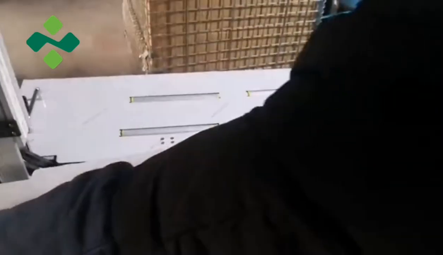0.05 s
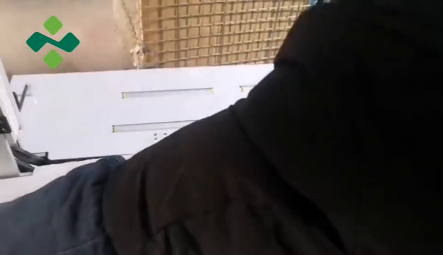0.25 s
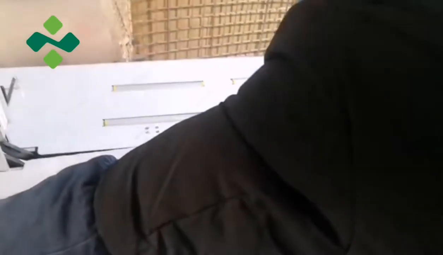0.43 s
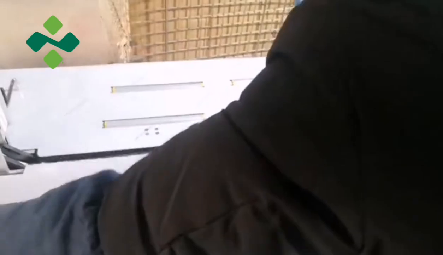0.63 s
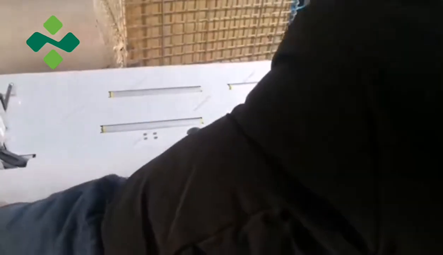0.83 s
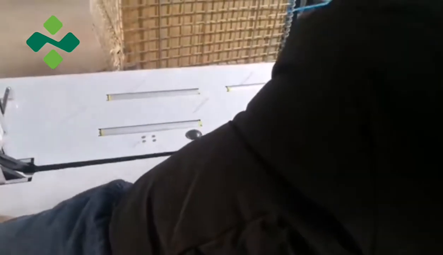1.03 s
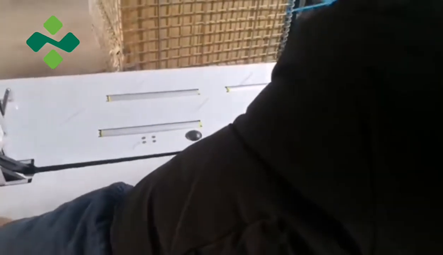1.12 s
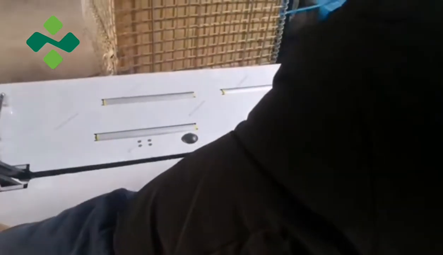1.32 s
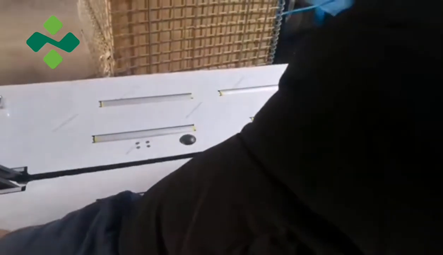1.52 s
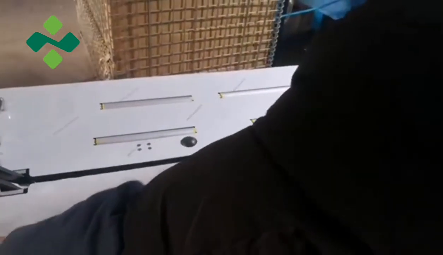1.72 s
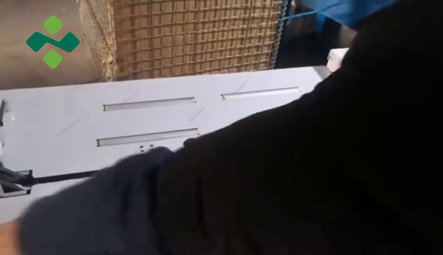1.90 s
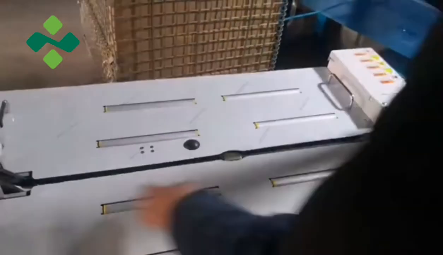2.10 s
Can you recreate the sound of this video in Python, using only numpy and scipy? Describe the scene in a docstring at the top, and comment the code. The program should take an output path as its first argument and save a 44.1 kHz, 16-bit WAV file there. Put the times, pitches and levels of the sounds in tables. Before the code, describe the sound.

Close metallic clacks and rasping strap from one strapping machine cycle, over a low hum.

```python
"""A strapping machine runs one cycle, close on the left in a workshop. Its plastic strap sticks and slips
through a steel guide, first fed, then pulled tight. Clamps and cutter clack and ring in the panels and steel
head; the sheet-metal cabinet rumbles and thuds. The motor drones, loose links rattle and the strap squeals
briefly as it is dragged tight. A low hum, a thin electric whine and fan noise go on throughout."""
import sys
import numpy as np
from scipy.fft import rfft, irfft, next_fast_len
from scipy.io import wavfile
from scipy.ndimage import map_coordinates

SR = 44100
rng = np.random.default_rng(int(sys.argv[2]) if len(sys.argv) > 2 else 0)


def pcm_store(signal):
    """Save signal as 16-bit PCM."""
    levels = np.round(np.clip(np.atleast_2d(signal), -1, 1) * 32767)
    wavfile.write(sys.argv[1], SR, levels.astype(np.int16).T)


N = 94815
ATTACK_S = 0.0011

# steel clamp head modes (frequency [Hz], relative level [dB], t60 [s])
HEAD_MODES = [(1917, -13.5, 0.083), (2347, -8.5, 0.29), (2466, -24.5, 0.23), (2595, -13, 0.11),
              (2635, -3, 0.28), (2840, 1.5, .2), (3135, -7, 0.24), (3360, -1.5, 0.18), (3883, 0, 0.11)]
# left-right likeness (frequency [Hz], correlation [1])
COHERENCE = [(120, .999), (260, 0.9), (500, 0)]
# shadow on the right side (frequency [Hz], share of pan_db [1])
SHADOW_SHARE = [(280, 0.026), (550, 0.38), (1200, 0.39), (2800, 1.02)]


def amp(db):
    """Decibels to gain."""
    return 10 ** (np.asarray(db) / 20)


def unit(x):
    """Scale to rms 1."""
    return x / np.sqrt(np.mean(x ** 2) + 1e-20)


def time_s():
    """Time of each sample."""
    return np.arange(N) / SR


def log_interp(points, hz):
    """Interpolate (frequency [Hz], value) points on a log axis."""
    points_hz, values = np.transpose(points)
    return np.interp(np.log(hz + 1), np.log(points_hz + 1), values)


def curves(rows):
    """One value per sample for each column after the time."""
    times_s, *columns = np.transpose(rows)
    return [np.interp(time_s(), times_s, column) for column in columns]


def wobble(rate_hz):
    """Smooth random curve, rate_hz knots a second."""
    return map_coordinates(rng.standard_normal(N // 8), [time_s() * rate_hz], mode="wrap")


def filtered(x, response):
    """Apply the gain response(hz) by FFT."""
    size = next_fast_len(N + SR // 2)
    return irfft(rfft(x, size) * response(np.fft.rfftfreq(size, 1 / SR)), size)[..., :N]


def skew_rad(hz):
    """Left-right phase angle that gives the coherence at hz."""
    return np.arccos(np.clip(log_interp(COHERENCE, hz), -1, 1))


def shadow(hz, pan_db):
    """Gain of the right side; positive pan_db leans left."""
    return amp(-pan_db * log_interp(SHADOW_SHARE, hz))


def noise(colour, pan_db):
    """Coloured stereo noise, rms 1 on the left."""
    def mid_side_gain(hz):
        angle_rad = skew_rad(hz) / 2
        return amp(log_interp(colour, hz)) * [np.cos(angle_rad), np.sin(angle_rad)]
    mid, side = filtered(rng.standard_normal((2, N)), mid_side_gain)
    left = mid + side
    right = filtered(mid - side, lambda hz: shadow(hz, pan_db))
    return np.array([left, right]) / np.std(left)


def tone(hz, pan_db, waver_hz):
    """Wavering stereo sine, rms 1 on the left; high ones reach the two sides out of step."""
    phase = 2 * np.pi * (rng.random() + np.cumsum(hz + waver_hz * wobble(40.68)) / SR)
    offset_rad = rng.choice([-1, 1]) * skew_rad(hz)
    return np.sqrt(2) * np.array([np.sin(phase), shadow(hz, pan_db) * np.sin(phase + offset_rad)])


def blow(start_s, t60_s, hold_s=0, attack_s=ATTACK_S):
    """Impact envelope: linear rise, exponential decay from hold_s on."""
    age_s = time_s() - start_s
    return np.clip(age_s / attack_s, 0, 1) * amp(-60 * np.maximum(age_s - hold_s, 0) / t60_s)


def resonances(modes, hz, width_hz):
    """Gain of one bell-shaped peak per mode."""
    return sum(amp(db) / (1 + ((hz - mode_hz) / (width_hz / 2)) ** 2) for mode_hz, db, _ in modes)


def metallic(x):
    """Pass through steel: head resonances stand out of a ripple of dense frame modes."""
    def response(hz):
        ripple_db = 3.5 * map_coordinates(rng.standard_normal(N), [hz / 48], mode="wrap")  # 48 Hz knots
        return amp(ripple_db) + amp(-2.5) * resonances(HEAD_MODES, hz, width_hz=24)
    ringing = filtered(x, response)
    return ringing / np.std(ringing[0])


def idle():
    """Electric whine, hum and fan noise of the waiting machine."""
    # whine, one row per harmonic (level [dB], pan [dB])
    harmonics = [(-60.5, 9), (-55.5, 9.5), (-48.5, -1), (-45, 11.5)]
    # fan spectrum (frequency [Hz], relative level [dB])
    fan_colour = [(30, -5.5), (48, -4), (80, 0.5), (130, -13), (240, -10), (560, -17.5), (1600, -8),
                  (2600, -8), (4200, -17.5), (7400, -20), (7900, -57)]
    whine_hz, hum_hz = 649.7, 72
    whine = sum(amp(db + 1.3 * wobble(4.8)) * tone(k * whine_hz, pan_db, waver_hz=0.76)
                for k, (db, pan_db) in enumerate(harmonics, 1))
    hum = amp(-51) * tone(hum_hz, pan_db=0, waver_hz=1.5)
    fan = amp(-39 + 0.38 * wobble(30)) * noise(fan_colour, pan_db=10)
    return whine + hum + fan


def strap_slide(levels, rasp_colour, pan_db, grain_db):
    """The ribbed strap sticks and slips in its steel guide: a grainy, ringing rasp under a hiss."""
    # hiss spectrum (frequency [Hz], relative level [dB])
    hiss_colour = [(2800, -23), (4200, 4), (7400, 4.5), (7800, -34)]
    rasp_db, hiss_db = curves(levels)
    moving = (time_s() > levels[0][0]) & (time_s() < levels[-1][0])
    grain = unit(amp(grain_db * wobble(330)))
    rasp = amp(rasp_db) * metallic(grain * noise(rasp_colour, pan_db))
    hiss = amp(hiss_db) * metallic(grain * noise(hiss_colour, pan_db))
    return moving * (rasp + hiss)


def strap_feed():
    """The strap rushes through its guide."""
    # friction envelope (time [s], rasp [dB], hiss [dB])
    levels = [(.17, -51, -50), (.215, -40, -31.5), (.29, -20.5, -58), (.357, -22.5, -26),
              (.372, -19.5, -16), (.42, -15.5, -27.5), (.48, -23.5, -34.5), (.6, -25.5, -50.5),
              (.645, -34, -75), (.93, -39, -54), (.96, -79, -71)]
    # rasp spectrum (frequency [Hz], relative level [dB])
    rasp_colour = [(550, -16), (1000, -5), (2300, -1), (3500, -2.5), (4500, -10), (7000, -24.5)]
    return strap_slide(levels, rasp_colour, pan_db=9, grain_db=0.2)


def cabinet():
    """The cabinet rumbles with the mechanism and booms when the cam loads it."""
    # sheet-metal modes (frequency [Hz], relative level [dB], t60 [s])
    modes = [(208, 1.5, 0.14), (265, -3, 0.66), (375, -7, 0.21)]
    # cam loads (time [s], level [dB])
    loads = [(0.407, -37), (0.707, -32), (1.031, -21), (1.371, -24.5)]
    # rumble envelope (time [s], level [dB])
    rumble_levels = [(.2, -52), (.41, -38.5), (.58, -34), (.7, -33), (.83, -42.5), (.96, -37.5),
                     (1.07, -32.5), (1.27, -37.5), (1.39, -31.5), (1.56, -44.5), (1.85, -48.5)]
    # rumble spectrum (frequency [Hz], relative level [dB])
    rumble_colour = [(55, -13.5), (120, -1), (200, 2), (370, 0), (470, -14.5), (900, -26)]
    thuds = sum(amp(db + mode_db) * tone(hz, pan_db=1.5, waver_hz=3.7)
                * blow(start_s, t60_s, attack_s=0.0054)
                for start_s, db in loads for hz, mode_db, t60_s in modes)
    shaking = noise(rumble_colour, pan_db=14.5)
    rumble = filtered(shaking, lambda hz: 1 + amp(-2.5) * resonances(modes, hz, width_hz=23))
    rumble_db, = curves(rumble_levels)
    return thuds + amp(rumble_db) * unit(rumble)


def steel(low_hz, pan_db):
    """Dense ring of a steel part; a smaller part has no low modes."""
    # steel spectrum (frequency [Hz], relative level [dB])
    colour = [(1200, -26.5), (1900, 4), (2700, -1), (3500, -5), (4200, -20.5), (5500, -49.5)]
    high_passed = filtered(noise(colour, pan_db), lambda hz: hz ** 10 / (hz ** 10 + low_hz ** 10.))
    return metallic(high_passed)


def clacks():
    """Clamps and cutter strike: each blow cracks, then rings on in the panels and steel head."""
    # blows (time [s], panel [dB], steel [dB], edge [dB], steel low cut [Hz], hold [s],
    # ring re crack [dB], pan [dB])
    blows = [(0.2303, -20, -11.5, -14.5, 1520, 0.0027, 0, 8.5),
             (0.7025, -27.5, -17, -24.5, 1760, 0.038, 5, 16),
             (0.9585, -6.5, -9.5, -18, 2110, 0.0033, -9, 16),
             (1.1355, -32, -5.5, -25.5, 2490, 0.0022, -10.5, 14),
             (1.4278, -25.5, -10, -27, 2500, 0.0072, -17, 16)]
    # pitched knocks of the hardest blows (time [s], frequency [Hz], level [dB])
    knocks = [(0.229, 1813, -4.5), (0.2335, 4107, -8.5), (0.9591, 997, -10)]
    # panel spectrum (frequency [Hz], relative level [dB])
    panel_colour = [(500, -39.5), (720, -14.5), (1100, -6.5), (1450, -12), (2500, -19.5)]
    # spectrum of the clack's bright edge (frequency [Hz], relative level [dB])
    edge_colour = [(3000, -33.5), (4100, -2.5), (7400, -9), (8300, -9)]
    out = sum(amp(db) * tone(hz, pan_db=10.5, waver_hz=21.6) * blow(start_s, t60_s=0.036)
              for start_s, hz, db in knocks)
    for start_s, panel_db, steel_db, edge_db, low_hz, hold_s, ring_db, pan_db in blows:
        body = amp(panel_db) * noise(panel_colour, pan_db)
        body += amp(steel_db) * steel(low_hz, pan_db)
        body += amp(edge_db) * noise(edge_colour, pan_db)
        crack = blow(start_s, t60_s=0.03, hold_s=hold_s)
        ring = amp(ring_db) * blow(start_s, t60_s=0.27)
        head = sum(amp(db) * tone(hz, pan_db, waver_hz=4.7) * blow(start_s, t60_s)
                   for hz, db, t60_s in HEAD_MODES)
        out += body * np.hypot(crack, ring) + amp(steel_db - 13) * head
    return amp(-0.5) * out


def motor():
    """The motor's low note swells for the feed and the pull, then sinks and fades."""
    # motor runs (time [s], frequency [Hz], level [dB])
    runs = [(.38, 73.8, -59), (.56, 77, -43.5), (.68, 83, -46.5), (.73, 84, -66), (.97, 99, -69.5),
            (1.12, 98.4, -42.5), (1.55, 97, -40.5), (2.15, 88.2, -70)]
    hz, db = curves(runs)
    return amp(db) * np.sqrt(2) * np.sin(2 * np.pi * np.cumsum(hz) / SR)


def rattle():
    """Loose steel links tick against each other; the first tick is a bounce just after the second clack."""
    # link impacts, with a clamp bounce after the second clack at 0.762 s (time [s], level [dB])
    ticks = [(0.762, -21), (1.345, -17.5), (1.376, -14), (1.442, -18), (1.719, -34.5)]
    power = sum((amp(db) * blow(start_s, t60_s=0.12)) ** 2 for start_s, db in ticks)
    return steel(low_hz=2300, pan_db=13.5) * np.sqrt(power)


def strap_pull():
    """The strap is dragged tight, then released."""
    # friction envelope (time [s], rasp [dB], hiss [dB])
    levels = [(.955, -47, -50), (.985, -17.5, -41), (1.06, -14.5, -20), (1.12, -17.5, -27.5),
              (1.165, -17, -28.5), (1.2, -26, -38), (1.33, -35.5, -59.5), (1.35, -22.5, -30),
              (1.375, -18, -27.5), (1.42, -19, -34.5), (1.447, -19, -32.5), (1.49, -27, -51),
              (1.59, -46, -85)]
    # rasp spectrum (frequency [Hz], relative level [dB])
    rasp_colour = [(450, -15.5), (800, -12), (1550, -9), (2550, 2), (3600, -6.5), (4300, -29), (7000, -29)]
    return strap_slide(levels, rasp_colour, pan_db=13.5, grain_db=2.0)


def whir():
    """The strap squeals briefly as it is dragged tight."""
    # squeal partials (frequency [Hz], relative level [dB])
    partials = [(1924, -30), (2105, -27.5), (2321, -34), (2882, -31.5), (3622, -39), (3799, -31.5),
                (5901, -34), (6935, -39), (7322, -34.5)]
    peak_s, sigma_s, gain_db = 1.063, 0.032, 4.5
    swell = np.exp(-((time_s() - peak_s) / sigma_s) ** 2 / 2)
    return swell * sum(amp(db + gain_db) * tone(hz, pan_db=14, waver_hz=10) for hz, db in partials)


def scene():
    """One strapping cycle over the idle hum."""
    strap = strap_feed() + strap_pull()
    return strap + clacks() + whir() + rattle() + cabinet() + motor() + idle()


def record(dry):
    """Steep low-pass."""
    cutoff_hz = 7700
    return filtered(dry, lambda hz: 1 / (1 + (hz / cutoff_hz) ** 120))


dry = scene()
out = record(dry)
pcm_store(out)
```